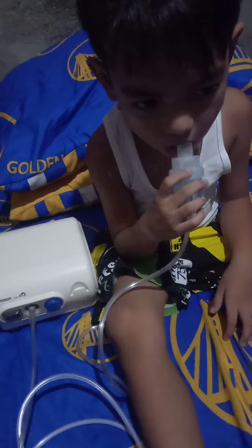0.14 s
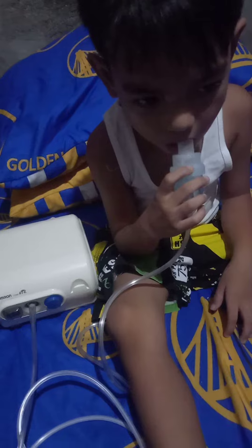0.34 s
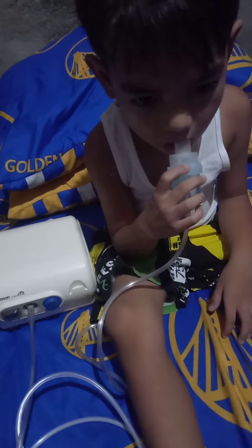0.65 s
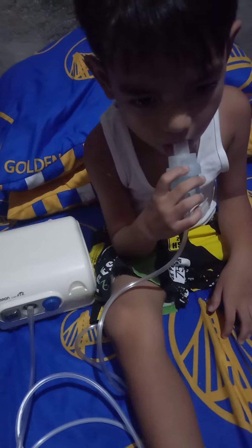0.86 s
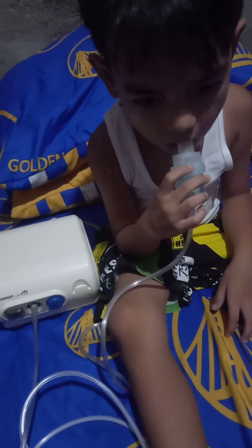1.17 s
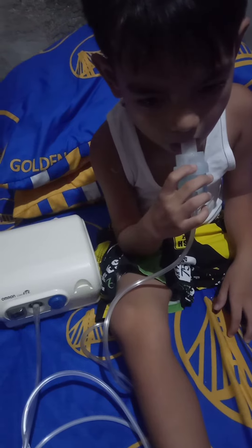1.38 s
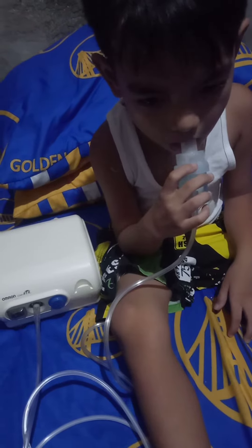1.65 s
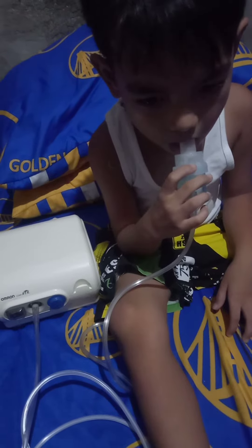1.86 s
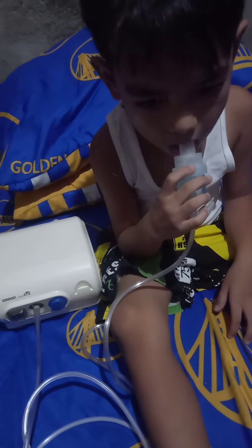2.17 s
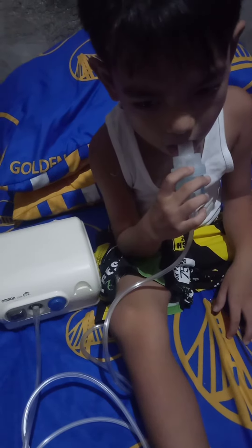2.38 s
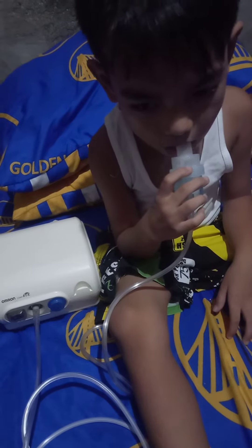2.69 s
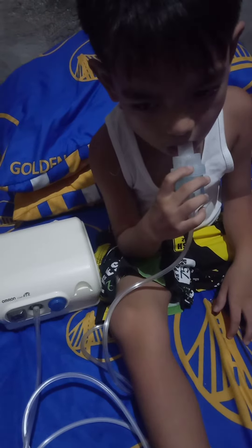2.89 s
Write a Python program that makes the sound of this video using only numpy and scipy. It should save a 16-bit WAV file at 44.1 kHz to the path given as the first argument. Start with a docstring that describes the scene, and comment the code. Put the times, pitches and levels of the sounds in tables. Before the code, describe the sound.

A nebulizer compressor drones with a low, buzzing hum while its mist jet hisses steadily.

```python
"""A piston compressor drives a nebulizer in a quiet room, close to the microphone.
Near silence comes first; then drone and hiss cut in, grow by some dB, and the mid hiss dips briefly near 1.9 s.
The mains field hums and buzzes; once a turn the piston thumps, valves tick and air puffs by a ringing reed.
The nebulizer jet hisses through the resonances of its plastic cup and mouthpiece; a cooling fan rushes
in the housing. Sums of sines make the tones, shaped noise makes the air sounds."""
import sys
import numpy as np
from scipy import signal
from scipy.fft import rfft, irfft, next_fast_len
from scipy.io import wavfile
from scipy.ndimage import uniform_filter1d, map_coordinates

SR = 44100
rng = np.random.default_rng(int(sys.argv[2]) if len(sys.argv) > 2 else 0)


def store_wav(level_fs):
    """Save 16-bit WAV to argv[1]."""
    pcm = np.round(np.clip(np.atleast_2d(level_fs), -1, 1) * 32767)
    wavfile.write(sys.argv[1], SR, pcm.T.astype(np.int16))


N = 133623  # samples, about 3 s

SHAFT_HZ, MAINS_HZ = 55.4775, 60.035


# Harmonics of the piston's thump: (multiple of the shaft speed [1], relative level [dB])
SHAFT_ORDERS = [(1, -10), (2, -7), (3, -17), (4, 1), (5, -11.5), (6, -20.5), (7, -14), (8, -22), (9, -11),
                (10, -25), (11, -28), (12, -20), (13, -11.5), (14, -39), (15, -17), (16, -33), (17, -40),
                (18, -41), (19, -25.5), (20, -36)]
# Multiples at which the housing sings: (multiple of the shaft speed [1], relative level [dB])
SINGING_ORDERS = [(35, -34), (37, -34), (40, -36.5), (42, -29), (53, -23.5), (56, -20.5)]
DRONE_DB, DRONE_FLUTTER_DB = 0.5, 0.43
SMEAR_S = 0.00055  # largest lag of a harmonic in the direct sound


def drone(turns):
    """Fourier series: a thump once a turn is a sum of shaft harmonics, smeared by the housing and the room."""
    out = np.zeros((2, N))
    for order, db in [*SHAFT_ORDERS, *SINGING_ORDERS]:
        direct_lag = order * SHAFT_HZ * SMEAR_S * rng.uniform(-0.99, 1)  # cycles
        scattered_lag = rng.random()  # the room scatters the phase fully
        lag = np.array([[direct_lag], [scattered_lag]])
        level = amp(db + DRONE_FLUTTER_DB * wobble(11))
        out -= level * np.cos(2 * np.pi * (order * turns - lag))
    return amp(DRONE_DB) * unit(out)


# Spectrum of the mains buzz: (frequency [Hz], relative level [dB])
BUZZ_SPECTRUM = [(60, -11), (92, 1), (112, 11), (175, -1), (230, -8), (290, -0.5), (400, -6), (460, 9.5),
                 (540, -6.5), (700, -2), (1100, -16.5), (1600, -20), (2300, -30), (3000, -15), (4000, -31)]
HUM_DB, BUZZ_DB = -5.5, -15.5
MAINS_START = -0.13  # cycles of the hum


def mains(turns):
    """Magnetic force: the motor's iron hums at twice the mains; the turning rotor chops this into a buzz."""
    cycles = 2 * MAINS_HZ * np.arange(N) / SR + MAINS_START
    hum = np.cos(2 * np.pi * cycles)
    chopped = cyclic(cycles, count=28) * cyclic(turns, count=6)
    return amp(HUM_DB) * hum + amp(BUZZ_DB) * coloured(chopped, BUZZ_SPECTRUM)


def cyclic(cycles, count):
    """Periodicity: count equal harmonics of random phase give a shape that repeats every cycle."""
    phases = rng.random(count)
    return unit(sum(np.sin(2 * np.pi * (k * cycles + p)) for k, p in enumerate(phases, 1)))


# The jet's hiss in three registers, each: (frequency [Hz], relative level per Hz [dB])
JET_LOW = [(1500, -26.5), (2500, -8), (2900, 1.5), (3300, -4), (3700, -3.5), (3980, -13.5), (4080, 0),
           (4270, -26), (4550, 1), (4700, -7), (4870, 6), (5080, -15), (5450, -6), (5900, -52)]
JET_MID = [(5300, -35), (5800, -7.5), (6030, 3), (6200, -5.5), (6400, 7), (6850, 0.5), (7150, -8),
           (7500, -30), (7750, -4.5), (8100, -19), (8500, -3.5), (8700, -43), (9600, -61)]
JET_HIGH = [(8500, -30), (9200, -50), (9650, -14.5), (9900, -2.5), (10250, -8.5), (10650, -19),
            (11400, -11), (11820, -2), (12200, -12), (12600, -20), (13000, -2.5), (14150, -7), (14650, 7),
            (15200, -5), (15800, -12)]
# Course of the hiss, before the offsets below:
# (time [s], low level [dB], middle level [dB], high level [dB])
HISS_LEVELS = [(0.1, -50.5, -42.5, -35), (0.35, -49.2, -41, -35), (0.55, -47.5, -41.5, -35.3),
               (0.65, -47.5, -42.5, -37), (0.77, -49, -41.5, -36), (1.15, -47, -38.5, -34),
               (1.62, -45, -37, -33), (1.8, -44.5, -38.3, -35), (1.88, -44, -46, -35.5),
               (2.0, -43.5, -41, -36), (2.15, -45.5, -36, -33.5), (2.31, -45.5, -37, -33),
               (2.45, -44.5, -36.5, -32.5), (2.72, -44, -36, -33), (3.0, -44.8, -37.5, -31.5)]
# Shift of the middle and high resonances: (time [s], share of their frequency [1])
RESONANCE_SHIFT = [(1.7, -0.0029), (1.92, -.018), (2.08, .004), (2.22, 0.0068), (2.45, 0.011)]
JET_LOW_DB, JET_MID_DB, JET_HIGH_DB = 3.5, -1.5, -3


def jet(turns):
    """Turbulent jet noise through resonances: it pulses with the pump and sputters as the liquid breaks up."""
    low_db, mid_db, high_db = curves(HISS_LEVELS)
    shift, = curves(RESONANCE_SHIFT)
    low = drifting(rush(JET_LOW)) * stroke(turns, swing_db=0.26, peak_turn=0.7)
    low *= amp(JET_LOW_DB + low_db + 0.6 * wobble(29.3))
    # a negative swing dips at peak_turn
    mid = drifting(shifted(rush(JET_MID), shift)) * stroke(turns, swing_db=-0.07, peak_turn=0.065)
    mid *= amp(JET_MID_DB + mid_db + 0.71 * wobble(30.53))
    high = drifting(shifted(rush(JET_HIGH), shift)) * stroke(turns, swing_db=0.86, peak_turn=0.87)
    high *= amp(JET_HIGH_DB + high_db + 0.66 * wobble(44.84))
    sputter_db = 0.3 * wobble(120) + 0.23 * wobble(8.7)
    return (low + mid + high) * amp(sputter_db)


DRIFT_DB = 2.04  # rms drift of the hiss colour


def drifting(x):
    """Time-varying filtering: the colour of a noise drifts in slow, narrow patches of its spectrogram."""
    z = signal.stft(x, nperseg=512)[2]
    field = rng.standard_normal(z.shape[1:])
    field = uniform_filter1d(field, size=3, axis=0)  # narrow in frequency
    field = uniform_filter1d(field, size=70, axis=1)  # slow in time
    return unit(signal.istft(z * amp(DRIFT_DB * unit(field)), nperseg=512)[1][:, :N])


def shifted(x, share):
    """Resampling: a changed reading speed moves all resonances by a share of their frequency."""
    place = np.cumsum(1 + share)
    return np.array([map_coordinates(c, [place], order=5, mode="wrap") for c in x])


# Spectrum of the air through the pump: (frequency [Hz], relative level [dB])
PUFF_SPECTRUM = [(3100, -14), (3520, -10), (3600, 15), (3820, 13), (3960, -14), (4300, -32)]
# Course of puff and reed together: (time [s], level before the offsets below [dB])
PUFF_LEVEL = [(0.1, -43.5), (0.7, -43), (1.15, -40.5), (1.55, -38.5), (2.0, -41), (2.6, -41.5), (3.0, -41)]
PUFF_DB, PUFF_SWING_DB, REED_DB = -8, 2, -7.5
PUFF_TURN = 0.694  # loudest this share of a turn after the thump


def pump_air(turns):
    """Modulated flow noise: a puff of air with each stroke, joined by the ringing reed."""
    level_db, = curves(PUFF_LEVEL)
    puff = rush(PUFF_SPECTRUM) * stroke(turns, swing_db=PUFF_SWING_DB, peak_turn=PUFF_TURN)
    air = amp(PUFF_DB) * puff + amp(REED_DB) * reed(turns)
    return amp(level_db + 0.28 * wobble(3.7)) * air


REED_HZ, REED_SPREAD_HZ = 3762, 65
REED_SCATTER_DB, REED_SWING_DB = 1.5, 5


def reed(turns):
    """Re-excited resonance: the outlet reed rings anew with every stroke, a little different each time."""
    since = turns - PUFF_TURN + .5  # a new ring starts half a turn before the puff peaks
    index = np.floor(since - np.floor(since[0])).astype(int)
    draws = rng.standard_normal((index[-1] + 1, 4))
    pitch, size, *phases = draws[index].T  # two phases: direct and scattered
    cycles = np.cumsum(REED_HZ + REED_SPREAD_HZ * pitch) / SR
    ring = np.sin(2 * np.pi * (cycles + np.array(phases)))
    swell = stroke(turns, swing_db=REED_SWING_DB, peak_turn=PUFF_TURN)
    fade = np.abs(np.sin(np.pi * since))  # silent where one ring gives way to the next
    return unit(ring * amp(REED_SCATTER_DB * size) * swell * fade)


# The valves snap shut: (share of a turn after the thump [1], relative level [dB])
VALVES = [(0.51, -2.5), (0.93, -7), (0.0592, -4.5)]
# Spectrum of a valve tick: (frequency [Hz], relative level [dB])
TICK_SPECTRUM = [(600, -26), (1100, -4.5), (1500, -9.5), (1750, -9), (2100, -3), (2500, -3), (3000, 8.5),
                 (3400, -3), (5000, -13)]
TICK_DB, TICK_SCATTER_DB, TICK_T60_S = -14, 1.1, 0.0081
TICK_LOOSE = 0.77  # loose rattle relative to the repeated ring


def valve(turns):
    """Impact and decay: each valve ticks once a turn, partly the same ring each time, partly loose rattle."""
    t = np.arange(SR // 30) / SR
    out = np.zeros((2, N + len(t)))
    for turn, db in VALVES:
        ring = rng.standard_normal((2, len(t)))
        for i in np.flatnonzero(np.diff(np.floor(turns - turn))):
            tick = ring + TICK_LOOSE * rng.standard_normal(ring.shape)
            decay_db = -60 * t / TICK_T60_S
            out[:, i:i + len(t)] += tick * amp(db + TICK_SCATTER_DB * rng.normal() + decay_db)
    return amp(TICK_DB) * coloured(out[:, :N], TICK_SPECTRUM)


# Rush of the fan in the housing, also the colour of the faint floor:
# (frequency [Hz], relative level per Hz [dB])
HOUSING_SPECTRUM = [(20, -29), (45, -17), (80, -6), (250, -0.5), (620, -6.5), (700, -3), (760, 9),
                    (805, -3), (870, -0.5), (1150, -8.5), (1350, -13.5), (1480, -11), (1700, -18),
                    (2400, -15.5), (3000, -22)]
FAN_DB, FAN_SCATTERED_DB, FAN_SWING_DB = -11, 1.5, 2  # the second is added to the scattered part


def fan(turns):
    """Broadband flow noise: the cooling fan rushes in the housing, loudest just after the thump."""
    level_db = FAN_DB + np.array([[0], [FAN_SCATTERED_DB]])
    return amp(level_db) * rush(HOUSING_SPECTRUM) * stroke(turns, swing_db=FAN_SWING_DB, peak_turn=0.18)


def rush(spectrum):
    """Incoherence: two unrelated noises stand for the direct and the scattered sound."""
    return coloured(rng.standard_normal((2, N)), spectrum)


def stroke(turns, swing_db, peak_turn):
    """Amplitude modulation: a gain of rms 1 that swells once a turn."""
    return unit(amp(swing_db * np.cos(2 * np.pi * (turns - peak_turn))))


# Stereo width: (frequency [Hz], side over mid [dB])
WIDTH = [(60, -38), (200, -38), (330, -8), (480, -6.5), (750, -7), (1100, -2), (2600, 1), (3100, -1.5),
         (3450, 2.5), (3780, -1), (4200, 3), (4900, -10.5), (6500, -4), (7100, -5), (7550, 11),
         (8400, -4.5), (11800, 0.5), (13000, -5), (13700, 6.5), (14600, -0.5), (15500, 5)]
# Stereo balance: (frequency [Hz], left minus right [dB])
LEAN = [(60, 3), (150, -4.5), (250, -1.5), (340, -4.5), (430, -3.5), (520, 1), (660, -1.5), (830, 4.5),
        (1100, -5.5), (1400, 0.5), (2150, -2.5), (2550, 1.5), (2950, -5.5), (3800, 3.5), (4200, 1),
        (4900, 0), (6410, 3), (8000, -1), (9810, -5), (14200, 5), (15500, -4)]
# Direct sound: (frequency [Hz], share of the side amplitude straight from the source [1])
DIRECT = [(200, 1), (700, 0.33), (1500, 0.25), (3000, .4), (3700, 0.76), (6500, 0.36), (9000, .35),
          (14000, .55)]


def ports(pair):
    """Phase and level differences: two microphone ports hear the sound, the left one reached first."""
    def side_response(hz):
        direct = np.clip(along(DIRECT, hz), 0, 1)
        # a quarter-cycle lead for the direct part; powers of both parts sum to one
        return amp(along(WIDTH, hz)) * np.array([1j * direct, np.sqrt(1 - direct ** 2)])

    side = filtered(pair, side_response).sum(axis=0)
    left_right = np.array([pair[0] + side, pair[0] - side])
    return filtered(left_right, lambda hz: amp(np.outer([.5, -.5], along(LEAN, hz))))


def amp(db):
    """Level law: amplitude ratio of a level in dB."""
    return 10 ** (np.asarray(db) / 20)


def unit(x):
    """Normalization: scale to rms 1 over all channels."""
    return x / np.sqrt(np.mean(x ** 2) + 1e-20)


def along(points, hz):
    """Logarithmic frequency scale: interpolate (frequency [Hz], value) points on it."""
    f, v = np.transpose(points)
    return np.interp(np.log(hz + 1), np.log(f + 1), v)


def curves(rows):
    """Linear interpolation: one value per sample for each column after the time."""
    s, *cols = np.transpose(rows)
    return [np.interp(np.arange(N) / SR, s, c) for c in cols]


def wobble(rate):
    """Band-limited fluctuation: a smooth random curve with rate knots a second."""
    knots = rng.standard_normal(int(N * rate / SR) + 4)
    return map_coordinates(knots, [np.arange(N) * rate / SR])


def filtered(x, response):
    """Convolution theorem: multiply the spectrum of x by a complex response of frequency."""
    m = next_fast_len(N + SR // 2)
    return irfft(rfft(x, m) * response(np.fft.rfftfreq(m, 1 / SR)), m)[..., :N]


def coloured(x, spectrum):
    """Spectral shaping: x through a spectrum, at rms 1."""
    return unit(filtered(x, lambda hz: amp(along(spectrum, hz))))


# Course of the compressor: (time [s], level before each layer's own offset [dB])
COMPRESSOR_LEVEL = [(0.1, -35), (0.7, -35), (1.15, -34), (1.6, -32.5), (2.3, -32.5), (3.0, -32.5)]
START_TURN, SPEED_WANDER = -0.22, 0.00015  # turns; share of the shaft speed
STROKE_SCATTER_DB = 0.77  # ticks and puffs rise and fall together
START_S, RISE_S = 0.0678, 0.0027  # the sound cuts in
FLOOR_DB = -103


def scene():
    """Common drive and superposition: the shaft's turning times the layers, which add over a faint floor."""
    speed = SHAFT_HZ * (1 + SPEED_WANDER * wobble(5.14))
    turns = np.cumsum(speed) / SR + START_TURN
    level_db, = curves(COMPRESSOR_LEVEL)
    strength = amp(STROKE_SCATTER_DB * wobble(SHAFT_HZ))
    compressor = amp(level_db) * (drone(turns) + mains(turns) + strength * valve(turns) + fan(turns))
    machine = ports(compressor + strength * pump_air(turns) + jet(turns))
    opening = np.clip((np.arange(N) / SR - START_S) / RISE_S, 0, 1)
    return machine * opening + amp(FLOOR_DB) * rush(HOUSING_SPECTRUM)


TOP_HZ = 15780


def record(dry):
    """Band limitation: nothing is kept from TOP_HZ upward."""
    return filtered(dry, lambda hz: hz < TOP_HZ)


dry = scene()
out = record(dry)
store_wav(out)
```